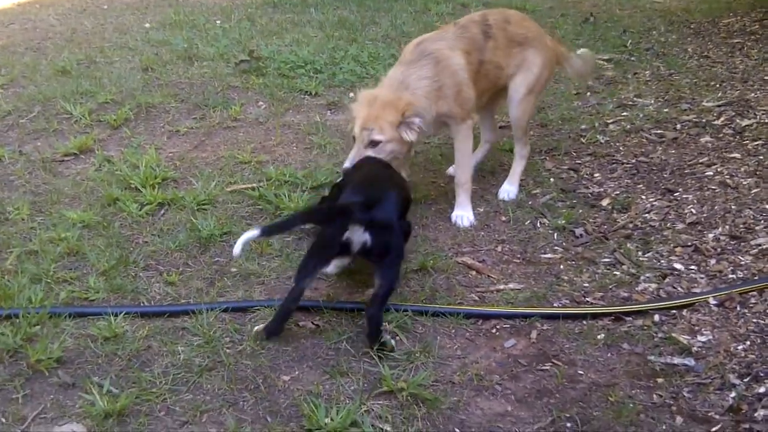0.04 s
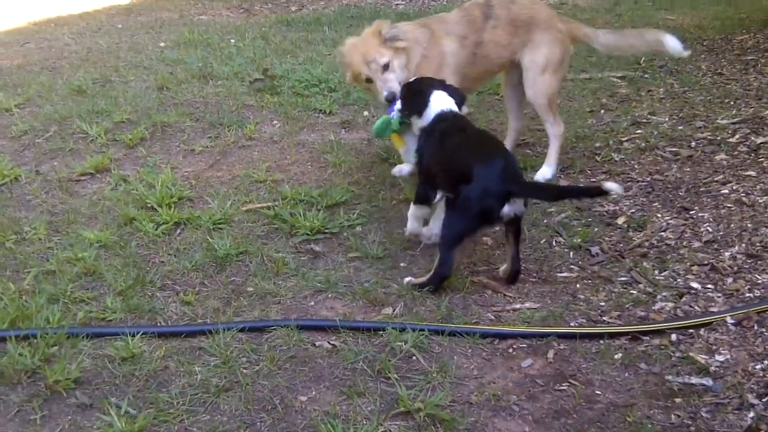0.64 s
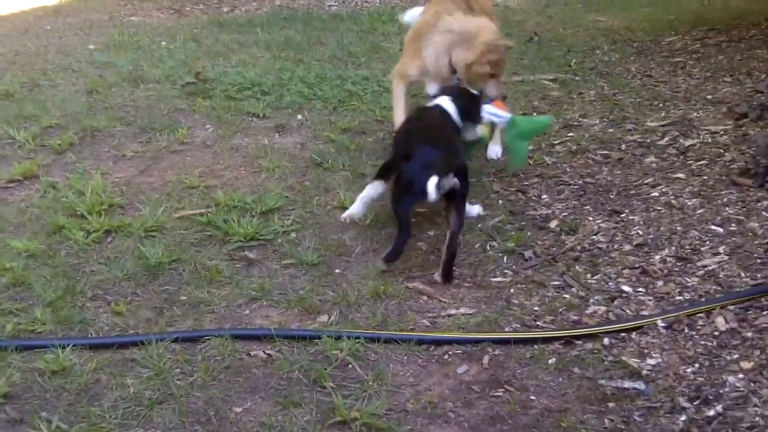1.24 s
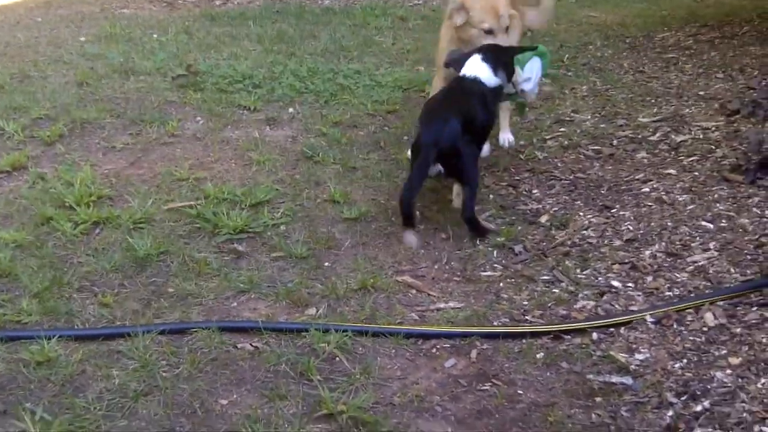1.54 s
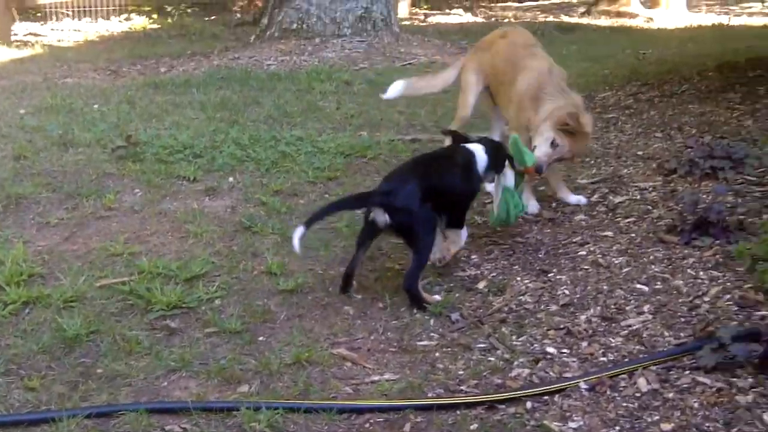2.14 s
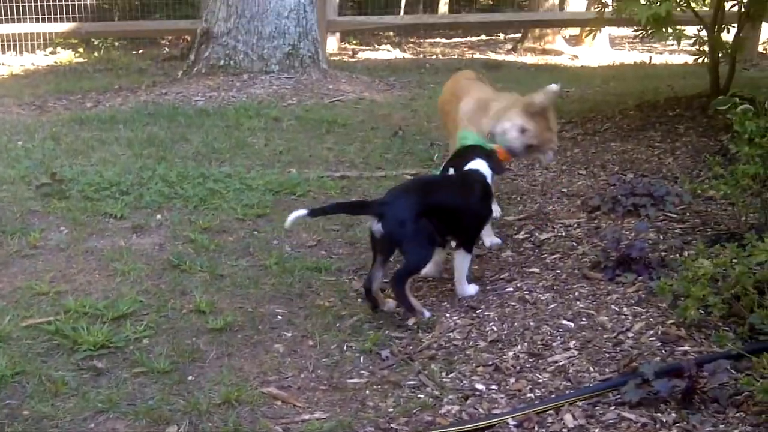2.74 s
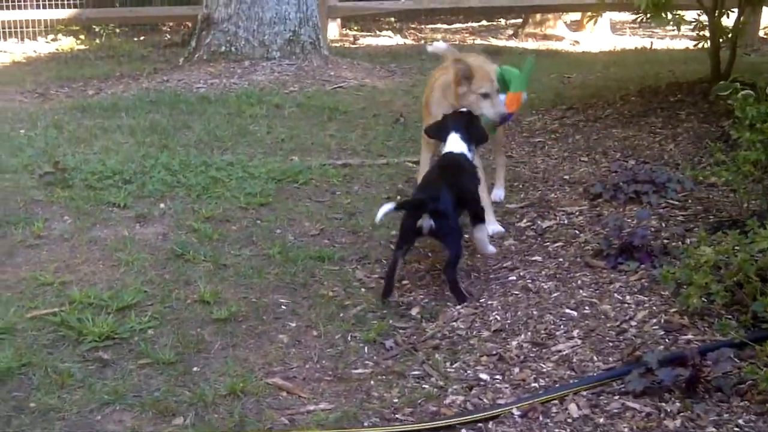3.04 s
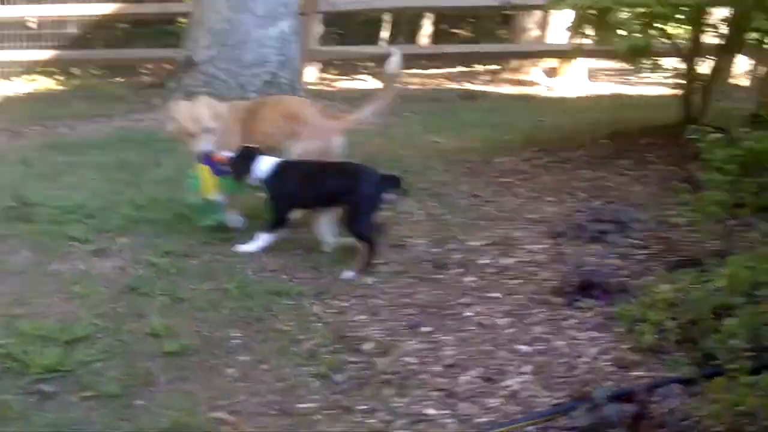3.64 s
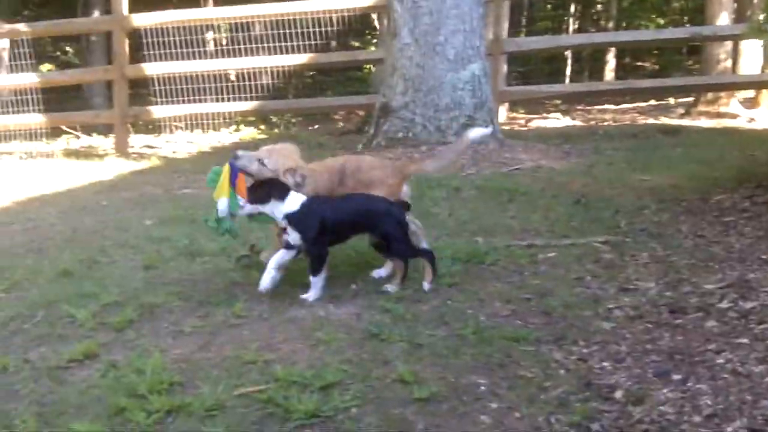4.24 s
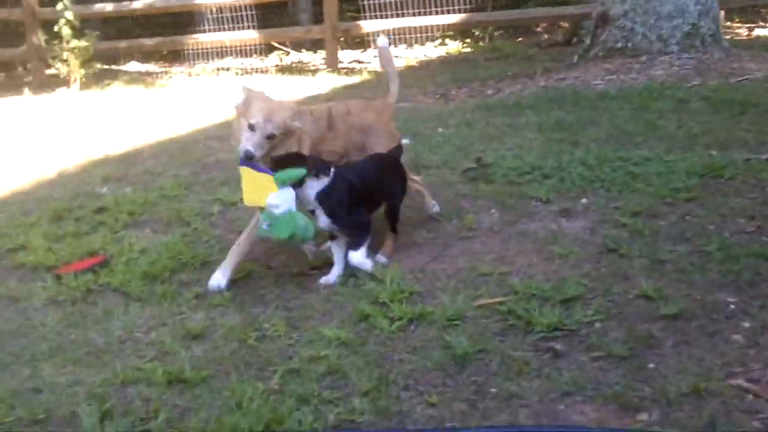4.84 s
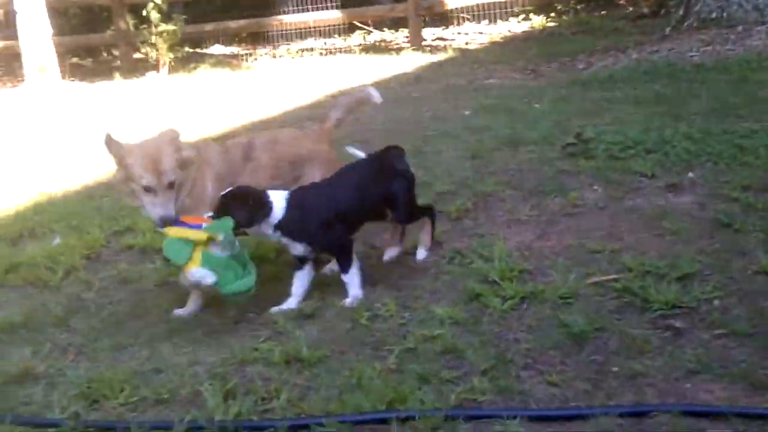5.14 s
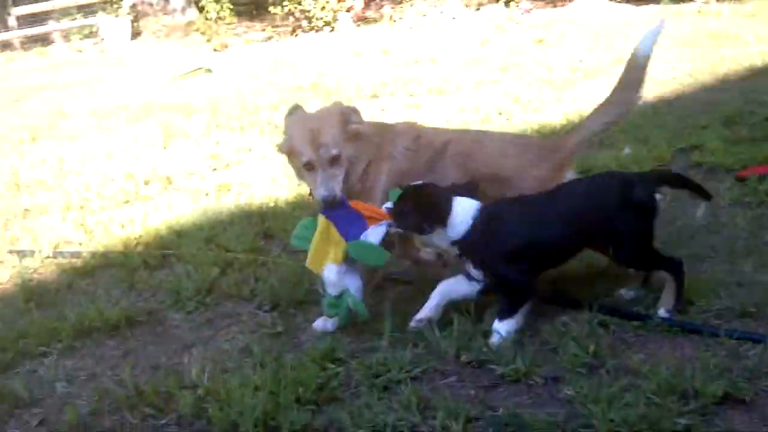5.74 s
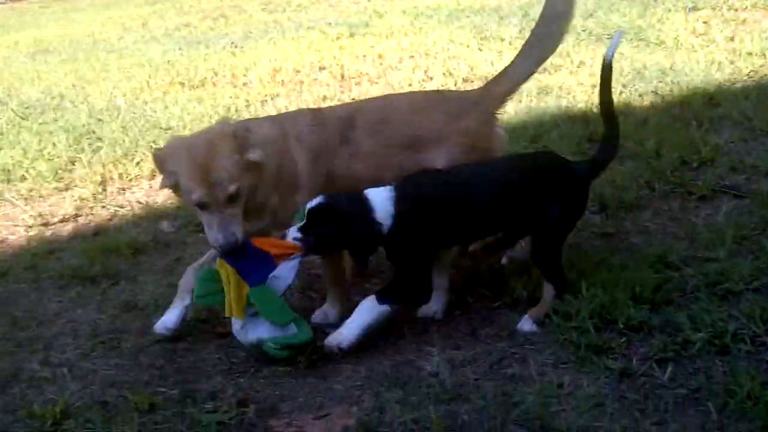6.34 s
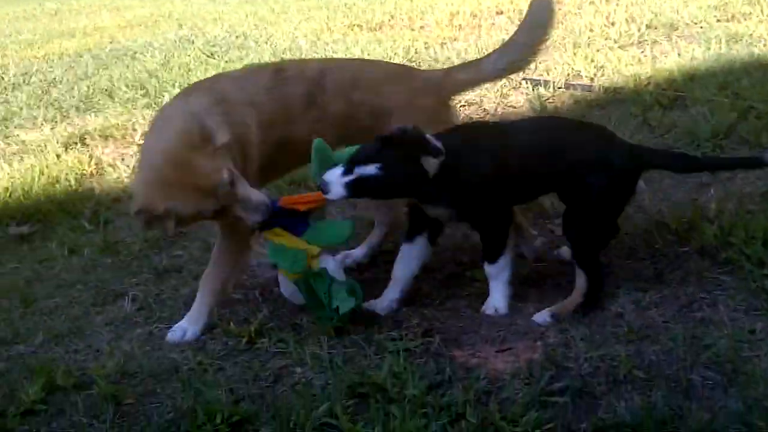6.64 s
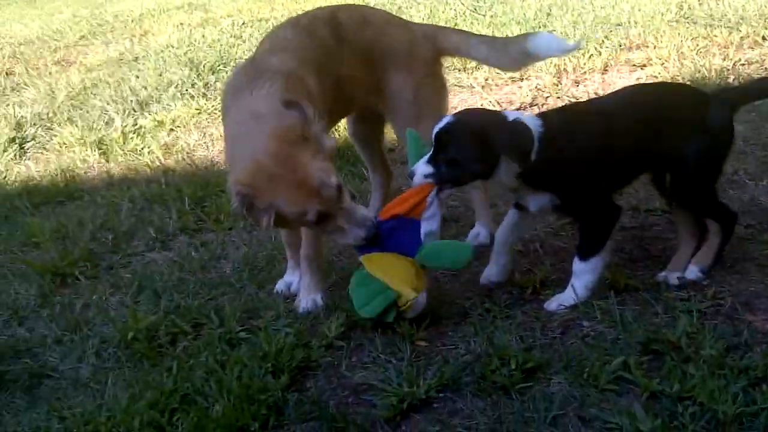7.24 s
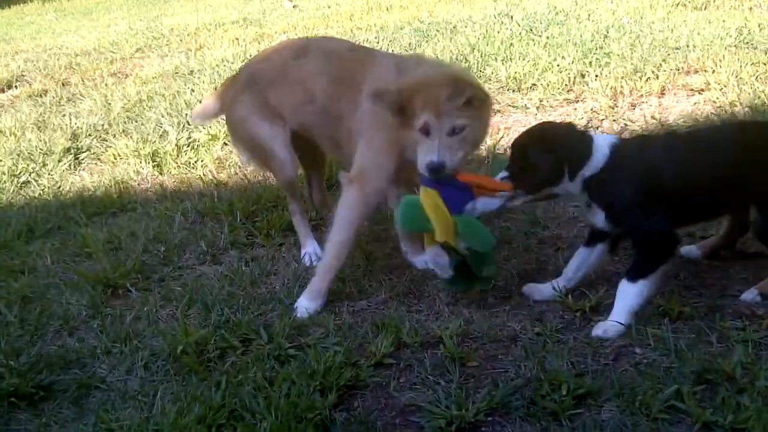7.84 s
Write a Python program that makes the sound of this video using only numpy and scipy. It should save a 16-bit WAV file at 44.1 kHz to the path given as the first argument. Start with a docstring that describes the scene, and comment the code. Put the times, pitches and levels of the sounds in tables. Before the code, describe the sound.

Two dogs growl in short, rattling bursts over a soft toy, with collar tags jingling and paws rustling in a quiet yard.

```python
"""Two dogs play tug-of-war

Two dogs pull at a soft toy in a quiet yard; their slack vocal folds slap out short, rattling growls.
Paws rustle in grass and mulch and snap twigs. Tugs make metal collar tags jingle and a buckle clack,
and the toy rubs between the teeth. Light air bumps the microphone, and a far bird whistles faintly."""
import sys
import numpy as np
from scipy import signal
from scipy.fft import rfft, irfft, next_fast_len
from scipy.io import wavfile
from scipy.ndimage import uniform_filter1d, map_coordinates

SR = 44100
rng = np.random.default_rng(int(sys.argv[2]) if len(sys.argv) > 2 else 0)


def persist_wave(psi):
    """Save psi, clipped to +-1, as 16-bit WAV."""
    counts = np.round(np.clip(psi, -1, 1) * 32767).astype(np.int16)
    wavfile.write(sys.argv[1], SR, np.atleast_2d(counts).T)


N = 347508

# Surges of growling: t/s, length/s, chest level/dB, throat and mouth levels/dB (relative to the chest),
# slap rate/Hz, lips (0 loose, 1 drawn back), roughness (0 smooth, about 1 rough)
SURGES = [(0.046, 0.026, -57.5, 2.5, 9.5, 140.6, .1, 0.96),
          (0.103, 0.063, -50.5, 5, -5.5, 140.2, 0.22, 0.92), (0.197, 0.1, -53, -1.5, -4, 144, 0.08, 1),
          (0.811, 0.18, -54, -2.5, -4, 150, 0.83, 0.53), (1.149, .11, -51.5, -2, -5, 162.1, .5, 0.47),
          (1.297, 0.063, -51.5, -2, -11.5, 170, 0.67, 0.2),
          (2.279, .23, -58, -3.5, -10.5, 158.7, 0.63, .52), (3.54, .06, -58.5, 1.5, -6, 150.1, .8, .8),
          (3.74, .04, -53.5, -0.5, -9, 150, 0.54, .8), (3.964, 0.045, -53.5, -1, -4.5, 150, 0.99, 0.77),
          (4.851, 0.044, -54, 0.5, 0, 149.7, .46, 0.94), (4.949, .11, -56.5, -1, 1, 129.5, 0, 1),
          (5.1, .11, -50, -0.5, -6, 178, .82, 0.57), (5.597, 0.089, -53, -3, -3, 149.1, 0.64, 0.78),
          (6.069, .19, -49, -2.5, -7, 160.4, 0.58, 1), (6.121, 0.022, -43.5, 0.5, -1, 140, 0.82, 1.04),
          (6.305, 0.061, -44.5, -4.5, -5.5, 166.5, 0.94, .9), (6.44, .03, -46.5, -8, -5, 160, 0.94, .9),
          (6.485, .05, -40, -7, -1, 154.7, 0.94, 0.91), (6.576, 0.094, -54, -17, -3, 149.9, 0.31, 1),
          (7.21, 0.078, -52.5, -9.5, -11.5, 137, .05, 1), (7.319, 0.15, -51, -10, .5, 135.3, 0.08, 1.01),
          (7.745, 0.14, -53.5, -8, -4, 135, 0.2, 1.02)]


def amp(db):
    """Turn decibels into a gain to multiply by."""
    return 10 ** (np.asarray(db) / 20)


def unit(x):
    """Scale a sound to an average strength (rms) of 1."""
    return x / np.sqrt(np.mean(x ** 2) + 1e-20)


def along(points, hz):
    """Read between rows of f/Hz, value, with the octaves evenly spaced."""
    f, v = np.transpose(points)
    return np.interp(np.log(hz + 1), np.log(f + 1), v)


def curves(rows):
    """Join timed rows with straight lines: one curve for each column after t/s."""
    s, *cols = np.transpose(rows)
    return np.array([np.interp(np.arange(N) / SR, s, c) for c in cols])


def wobble(rate):
    """A smooth curve through `rate` random values a second."""
    return map_coordinates(rng.standard_normal(int(N * rate / SR) + 4), [np.arange(N) * rate / SR])


def filtered(x, response):
    """Multiply each frequency in a sound by response(hz)."""
    size = next_fast_len(N + SR // 2)
    return irfft(rfft(x, size) * response(np.fft.rfftfreq(size, 1 / SR)), size)[:N]


def coloured(x, spectrum):
    """Shape a sound's tone with rows of f/Hz, level/dB, then set its strength to 1."""
    return unit(filtered(x, lambda hz: amp(along(spectrum, hz))))


def resonate(x, modes):
    """Ring a sound through resonances: each passes one band and falls off steeply on both sides."""
    return filtered(x, lambda f: sum(amp(db) * (1j * f * w / (c * c - f * f + 1j * f * w)) ** 2 * (-1) ** k
                                     for k, (c, w, db) in enumerate(modes)))


def impulse_response(spectrum, size=2048):
    """How a body with this spectrum rings after one tap."""
    cepstrum = irfft(np.log(amp(along(spectrum, np.fft.rfftfreq(size, 1 / SR)))))
    cepstrum[1:size // 2] *= 2  # folding puts all the ringing after the tap
    cepstrum[size // 2 + 1:] = 0
    return irfft(np.exp(rfft(cepstrum)))


def steady(x, size=1400):
    """Even out slow changes in strength, keeping the fast roughness."""
    power = uniform_filter1d(uniform_filter1d(x * x, size), size)
    return x / np.sqrt(np.abs(power) + 1e-12)


def add(track, s, sound):
    """Mix a sound into the track at s seconds."""
    start = max(round(s * SR), 0)
    track[start:start + len(sound)] += sound[:max(N - start, 0)]


def swell(s, length, attack_s, release_s):
    """Rise to 1 at time s, hold for the length, then die away."""
    t = np.arange(N) / SR - s
    rise = (np.minimum(t, 0) / attack_s) ** 2
    fall = np.maximum(t - length, 0) / release_s
    return np.exp(-np.minimum(rise + fall, 30))


def swells(rows, attack_s, release_s):
    """The combined gain of swells given as t/s, length/s, level/dB."""
    return np.sqrt(sum((amp(db) * swell(s, length, attack_s, release_s)) ** 2 for s, length, db in rows))


def knocks(events, spectrum, fade_s, splinter):
    """Short blows ring a body; each has a splintery tail that falls 60 dB in fade_s."""
    out, t = np.zeros(N), np.arange(SR // 10) / SR
    body = impulse_response(spectrum)
    for s, db in events:
        blow = splinter * rng.standard_normal(len(t)) * amp(-60 * t / fade_s)
        blow[0] += 1
        sound = signal.fftconvolve(blow, body)
        add(out, s, amp(db) * sound / np.abs(sound).max())
    return out


def yard_hush(level_db=-57):
    """The soft, even background noise of the yard."""
    # Tone of the hush: f/Hz, level/dB
    tone = [(35, -60), (60, 2), (126, 2), (999, -11), (3120, -14), (4030, -16), (7200, -13.5),
            (11700, -21.5), (14500, -21), (15500, -27)]
    return amp(level_db) * coloured(rng.standard_normal(N), tone)


def air(calm_db=-61):
    """Moving air flutters on the microphone, with gusts and single push-and-pull puffs."""
    # Gusts: t/s, length/s, level/dB
    gusts = [(.3, .12, -55), (1.48, 0.07, -58), (2.08, .07, -51.5), (2.92, 0.091, -55), (4.6, .08, -55.5),
             (5.33, 0.046, -42.5)]
    # Tone of the flutter: f/Hz, level/dB
    rumble = [(15, -16), (27, 1.5), (45, -1.5), (80, -10.5), (130, -8), (300, -41), (800, -82)]
    # Puffs: t/s, peak level/dB, f/Hz
    puffs = [(0.389, -41, 96), (0.533, -40, 66), (2.10, -39.5, 55), (2.139, -40, 42.13), (5.364, -45, 54.7),
             (5.395, -39, 35.38), (5.594, -30, 89)]
    flow = np.hypot(amp(calm_db), swells(gusts, attack_s=0.046, release_s=0.034))
    out = flow * steady(coloured(rng.standard_normal(N), rumble), size=5000)
    t = np.arange(-SR // 10, SR // 10) / SR
    for s, db, hz in puffs:
        u = 2 * np.pi * hz * t
        add(out, s + t[0], -amp(db) * u * np.exp((1 - u * u) / 2))
    return out


def growl_effort(mouth_power=2.2):
    """Gains of chest, throat and mouth: each surge swells and fades, and the strongest one leads."""
    gains = np.zeros((3, N))
    for s, length, db, throat_db, mouth_db, *_ in SURGES:
        push = swell(s, length, attack_s=0.033, release_s=0.039)
        opening = push ** mouth_power  # the mouth opens later and shuts sooner than the chest sounds
        surge = [amp(db) * push, amp(db + throat_db) * push, amp(db + mouth_db) * opening]
        gains = np.maximum(gains, surge)
    return gains


def growl_shape():
    """Slap rate, lips and roughness glide from the middle of one surge to the next."""
    return curves(sorted((s + length / 2, hz, lips, rough) for s, length, *_, hz, lips, rough in SURGES))


def muzzle(x, lips):
    """The mouth rings at different pitches as the lips draw back."""
    # Mouth resonances with lips loose and drawn back: f/Hz, width/Hz, level/dB
    loose = [(830, 340, -8), (1155, 200, 2), (1432, 250, -1.5), (3150, 250, -14)]
    drawn_back = [(805, 220, -9.5), (1298, 250, -3.5), (1548, 200, -1), (1965, 620, -5), (2840, 420, -19.5),
                  (3590, 640, -10.5)]
    return np.sqrt(1 - lips) * resonate(x, loose) + np.sqrt(lips) * resonate(x, drawn_back)


def barks(lips):
    """The hardest slaps of the vocal folds bark through the mouth."""
    # Hard slaps: t/s, level/dB
    hard_slaps = [(.028, -39), (0.052, -36), (0.072, -38), (0.143, -36), (0.163, -36.5), (.184, -37),
                  (5.014, -42.5), (6.4989, -24.5), (6.502, -19.5), (7.304, -35), (7.351, -33), (7.377, -36),
                  (7.426, -35), (7.475, -41)]
    pulses = np.zeros(N)
    for s, db in hard_slaps:
        add(pulses, s, amp([db]))
    bark = muzzle(pulses, lips)
    return bark * pulses.max() / np.abs(bark).max()


def growls(jitter=.26, flap_hz=47, chest_db=0.5, throat_db=-2.0):
    """Slack vocal folds slap unevenly: the chest hums, the throat gargles and the mouth rattles."""
    # Resonances of the dog's airway: f/Hz, width/Hz, level/dB
    chest_modes = [(171.5, 88, 13), (281, 124, -4)]
    throat_modes = [(352, 387, -1.7), (504, 330, -0.31)]
    rate_hz, lips, rough = growl_shape()
    chest, throat, mouth = growl_effort()
    cycles = np.cumsum(rate_hz * np.exp(jitter * rough * wobble(190))) / SR
    slap_at = np.flatnonzero(np.diff(np.floor(cycles)))
    # Soft tissue flaps slowly above the folds: about every third slap is hard, which makes the rattle.
    flap = np.sin(2 * np.pi * np.cumsum(flap_hz * np.exp(jitter * wobble(40))) / SR)
    force = np.clip(flap[slap_at] + .7 * rng.standard_normal(len(slap_at)), -1.6, 1.6)
    breath_share = np.clip(0.5 * (rough + lips), 0, 1)

    def slaps(scatter_db):
        """Slaps of uneven strength, each followed by a 2 ms puff of rushing air."""
        pulses = np.bincount(slap_at, amp(scatter_db * force), N)
        puffs = signal.lfilter([1], [1, -np.exp(-1 / (.002 * SR))], pulses) * rng.standard_normal(N)
        return np.sqrt(1 - breath_share) * unit(pulses) + np.sqrt(breath_share) * unit(puffs)

    hum = amp(chest_db) * chest * steady(resonate(-slaps(0.5 * rough[slap_at]), chest_modes))
    gargle = amp(throat_db) * throat * steady(resonate(slaps(scatter_db=4), throat_modes))
    mouth_scatter_db = 8 - 5 * lips[slap_at]  # a hard snarl is denser than a loose rattle
    rattle = mouth * steady(muzzle(slaps(mouth_scatter_db), lips))
    return hum + gargle + rattle + barks(lips)


def paws(level_db=1.0, crackles_per_s=1100):
    """Grass swishes and many tiny dry chips crackle under the paws."""
    # Steady treading, louder as the dogs move onto the near grass: t/s, level/dB
    tread = [(0, -74), (3.0, -72), (3.8, -69), (5.5, -64.5), (6.2, -58), (6.9, -63), (7.88, -67)]
    # A paw or the toy brushes the ground: t/s, length/s, level/dB
    scuffs = [(.39, 0.072, -57), (1.59, 0.051, -66), (2.07, 0.047, -58.5), (3.2, .025, -59),
              (3.315, 0.0093, -55), (3.56, .05, -53.5), (3.66, 0.016, -54), (3.755, 0.016, -56),
              (5.63, 0.1, -58), (5.96, 0.017, -55), (6.03, 0.028, -57), (6.26, .08, -56),
              (6.372, 0.0073, -46.5), (6.535, 0.024, -56), (6.66, 0.047, -58)]
    # Tone of the grass: f/Hz, level/dB
    grass = [(400, -16), (1500, -9), (3000, -5), (5000, 0.5), (7500, 3.5), (12000, -1), (15000, -48)]
    crackles = (rng.random(N) < crackles_per_s / SR) * amp(4 * np.clip(rng.standard_normal(N), -2, 2))
    rustle = coloured(rng.standard_normal(N) + amp(-4) * unit(crackles), grass)
    flutter_db = 2 * wobble(45)
    contact = np.hypot(amp(curves(tread)[0]), swells(scuffs, attack_s=0.017, release_s=0.017))
    return contact * amp(level_db + flutter_db) * rustle


def twigs():
    """Twigs and bark chips snap underfoot."""
    # Snaps: t/s, peak level/dB
    snaps = [(1.049, -37.5), (1.690, -27), (2.675, -42), (2.813, -29.5), (3.6275, -25), (3.632, -23),
             (3.6475, -12.5), (4.372, -36.5), (6.374, -28.5), (6.558, -32.5)]
    # Tone of the wood: f/Hz, level/dB
    wood = [(100, -7), (180, -1), (450, -10.5), (1200, -3.5), (2050, 4), (3300, -11.5), (4400, 1.5),
            (6000, -5), (8800, -3.5), (9800, -10), (11300, -9), (13500, -25), (15500, -32)]
    return knocks(snaps, wood, fade_s=.008, splinter=.3)


def tag_strikes():
    """A tug swings the collar tags, which strike and bounce back at even gaps."""
    # Tugs: t/s, first level/dB, number of strikes, gap/s, change per strike/dB,
    # low and high tones/dB (relative to the main ring)
    jingles = [(1.159, -39, 1, 0, 0, 2, 1), (1.221, -39, 2, .043, -2, -4, -14), (1.337, -36, 1, 0, 0, 0, 2),
               (1.38, -32.5, 2, .019, -5, -10, -8), (1.579, -25.5, 2, .008, -3, -2, -19),
               (1.622, -33, 3, .042, -5.5, -1, -8), (1.899, -33.5, 1, 0, 0, 5, 16),
               (1.919, -34, 3, .011, 2, -4.5, -9), (2.096, -47, 1, 0, 0, -5, -7),
               (2.372, -43, 1, 0, 0, 4, -4), (2.568, -44.5, 1, 0.00075, 0, -7, -6),
               (2.828, -31, 3, .017, -0.5, 5, 0), (2.888, -30, 4, .018, -.5, -8, -3.5),
               (3.541, -36, 2, .009, 7, -4, -10), (3.758, -37.5, 1, 0, 0, -7, -8),
               (4.011, -32.5, 2, .013, 7, -10, -18), (4.045, -34.5, 2, .027, 0, -5, -16),
               (4.5, -43.5, 1, 0, 0, -9, -10), (5.239, -35.5, 1, 0, 0, -4, -5),
               (5.645, -31.5, 2, .027, -5, -8, -24), (5.787, -43, 1, 0, 0, -6, -17),
               (6.643, -42.5, 2, .053, 4, 0, -7), (6.884, -41.5, 1, 0, 0, -2, 1),
               (7.246, -40.5, 1, 0, 0, -14, -13), (7.64, -40.5, 1, 0, 0, 7, 3),
               (7.761, -36.5, 1, 0, 1, -14, -19)]
    return [(s + k * gap, db + k * change_db, low_db, high_db)
            for s, db, count, gap, change_db, low_db, high_db in jingles for k in range(round(count))]


def tags(chatter_width_hz=80, damped_s=.085, free_db=-19, tick_db=-11, tick_s=0.017):
    """Two metal tags strike, chatter and muffle each other; a weak free ring lingers."""
    # Tones of the tags: f/Hz, level/dB, free time to fall 60 dB/s, family (0 main, 1 low, 2 high)
    modes = [(5660, -10.5, 0.22, 1), (7040, -1, 0.39, 1), (7900, -0.5, 0.65, 1), (8366, 1.5, .33, 0),
             (8470, 2.5, 0.58, 0), (8680, -5.5, 0.071, 0), (10230, -7, .08, 2), (11400, -9, .12, 2),
             (13000, -3.5, .22, 2), (13700, -9, .14, 2), (14990, -14, .2, 2)]
    # Tone of the scraping tick: f/Hz, level/dB
    tick_tone = [(800, -38), (3000, -3.5), (6000, 5), (9000, 3.0), (15000, -15)]
    rings, ticks, t = np.zeros(N), np.zeros(N), np.arange(SR // 3) / SR
    for s, db, low_db, high_db in tag_strikes():
        ring = np.zeros(len(t))
        for hz, level, free_s, family in modes:
            phase = 2 * np.pi * (hz * t + rng.random())
            # While the tags touch, tiny contacts blur each pitch.
            chatter = np.cumsum(rng.standard_normal(len(t))) * np.sqrt(2 * np.pi * chatter_width_hz / SR)
            touching = amp(-60 * t / damped_s) * np.sin(phase + chatter)
            free = amp(free_db - 60 * t / free_s) * np.sin(phase)
            strike_db = rng.normal(0, 3)
            family_db = (0, low_db, high_db)[round(family)]
            ring += amp(level + strike_db + family_db) * (touching + free)
        ring *= 1 - np.exp(-t / 0.00072)  # soften the very start
        add(rings, s, amp(db) * ring / np.abs(ring).max())
        # Harder, brighter strikes scrape more.
        add(ticks, s, amp(db + tick_db + high_db / 2 - 60 * t / tick_s) * rng.laplace(0, .7, len(t)))
    return rings + filtered(ticks, lambda hz: amp(along(tick_tone, hz)))


def buckle(level_db=0.5):
    """The collar buckle clacks and rings briefly as the dogs tug."""
    # Clacks: t/s, level/dB
    blows = [(1.165, -32), (2.7485, -32), (2.7564, -34.5), (2.818, -38), (2.970, -35), (2.9745, -31),
             (4.112, -28), (4.115, -41), (5.743, -26.5)]
    # Tone of the buckle: f/Hz, level/dB
    body = [(710, -69), (1200, -34), (1390, -21), (2100, -12), (2510, -20.5), (3210, -13), (3560, -13.5),
            (4790, -4), (6720, -7.5), (8660, -10.5), (15000, -37)]
    # Its ringing resonance: f/Hz, width/Hz, level/dB
    ring = [(4770, 467, 2.5)]
    clacks = amp(level_db) * knocks(blows, body, fade_s=0.04, splinter=0.18)
    return clacks + resonate(clacks, ring)


def bird(blur_hz=110):
    """A far bird's falling whistles, blurred by distance."""
    # Whistles: t/s, length/s, starting f/Hz, ending f/Hz, level/dB
    whistles = [(2.085, 0.27, 3450, 2973, -68), (2.998, .2, 3770, 3040, -65.5)]
    out = np.zeros(N)
    for s, length, start_hz, end_hz, db in whistles:
        progress = np.linspace(0, 1, round(length * SR))
        hz = end_hz + (start_hz - end_hz) * (1 - progress) ** 2 + blur_hz * wobble(400)[:len(progress)]
        loudness = amp(db) * np.sqrt(np.abs(np.sin(np.pi * progress)))
        add(out, s, loudness * np.sin(2 * np.pi * np.cumsum(hz) / SR))
    return out


def toy(grip_db=2):
    """The stretched toy sticks and slips between the teeth with a thin rasp."""
    # Strength of the rubbing: t/s, level/dB
    rubbing = [(5.9, -86), (6.2, -59.5), (6.6, -70), (7.0, -79), (7.35, -59.5), (7.6, -67.5), (7.88, -58.5)]
    # Tone of the fabric: f/Hz, level/dB
    fabric = [(1500, -52), (2400, -7), (3200, -1), (4000, -8), (5000, -7), (8000, -10), (14000, -28)]
    return amp(curves(rubbing)[0] + grip_db * wobble(65)) * coloured(rng.standard_normal(N), fabric)


def yard_echo(x, delay_samples=400):
    """Fence and trees scatter the sound into a short tail."""
    # How long the echo lasts: f/Hz, time to fall 60 dB/s
    fades = [(200, 0.35), (2000, 0.14), (10000, 0.029)]
    hz, t, noise = signal.stft(rng.standard_normal(SR // 2), SR, nperseg=256)
    tail = signal.istft(noise * amp(-60 * t / along(fades, hz)[:, None]), SR, nperseg=256)[1]
    return signal.fftconvolve(np.pad(x, (delay_samples, 0)), tail / np.linalg.norm(tail))[:N]


def scene():
    """The dogs close by, over the hush of the yard, in one channel."""
    clacks_and_snaps = buckle() + twigs()
    voices = growls()
    clatter = clacks_and_snaps + tags() + paws() + toy()
    echo = yard_echo(amp(-17) * voices + amp(-22) * clatter)
    return (voices + clatter + echo + yard_hush() + air() + bird())[None]


def record(dry, top_hz=15650):
    """Cut away the very highest treble."""
    return filtered(dry[0], lambda hz: hz < top_hz)[None]


dry = scene()
out = record(dry)
persist_wave(out)
```